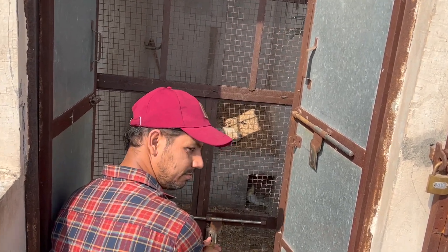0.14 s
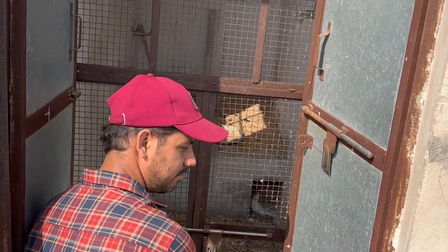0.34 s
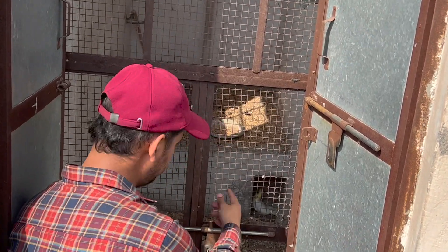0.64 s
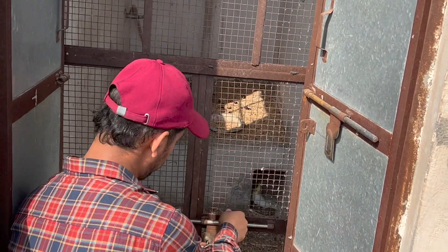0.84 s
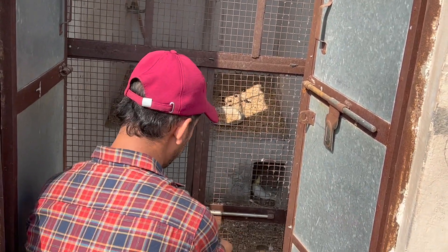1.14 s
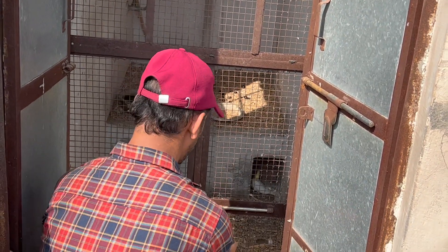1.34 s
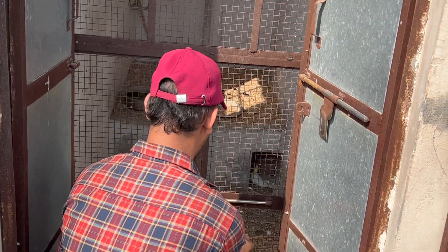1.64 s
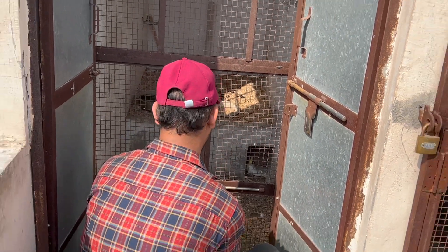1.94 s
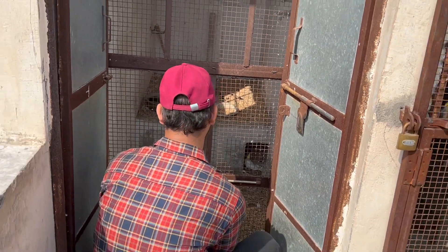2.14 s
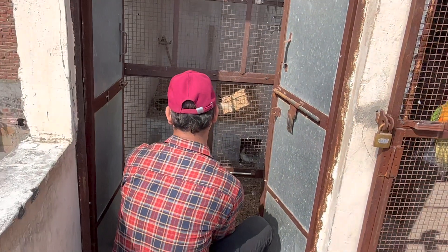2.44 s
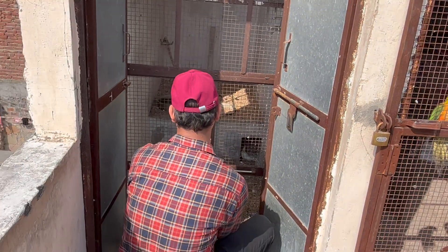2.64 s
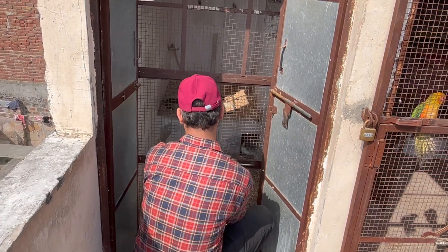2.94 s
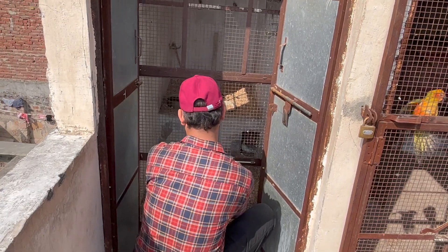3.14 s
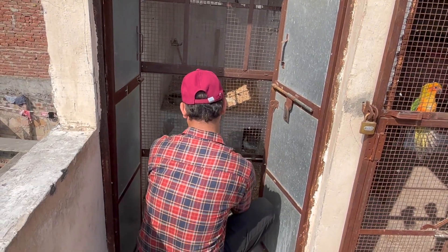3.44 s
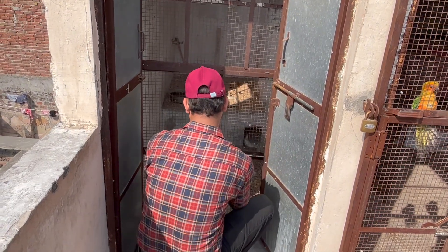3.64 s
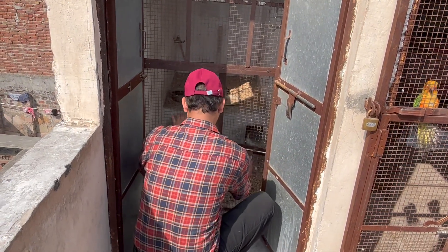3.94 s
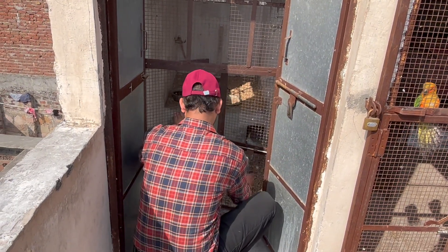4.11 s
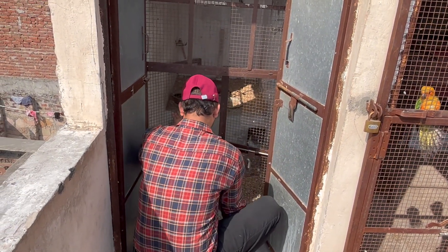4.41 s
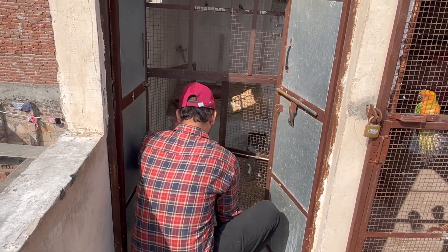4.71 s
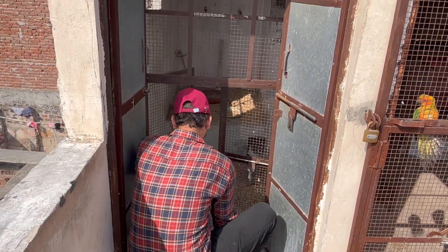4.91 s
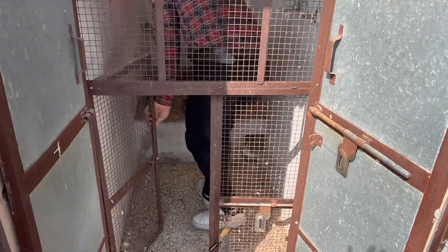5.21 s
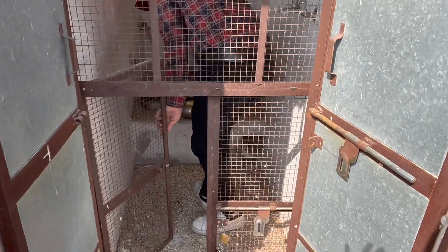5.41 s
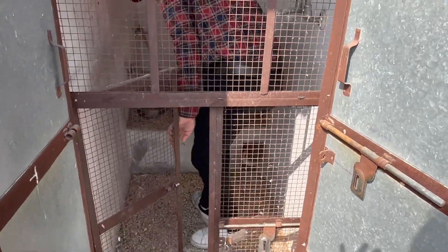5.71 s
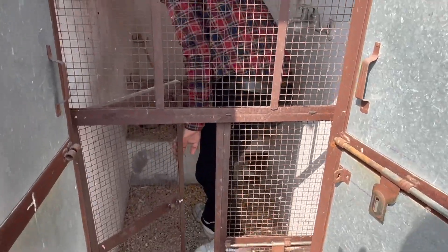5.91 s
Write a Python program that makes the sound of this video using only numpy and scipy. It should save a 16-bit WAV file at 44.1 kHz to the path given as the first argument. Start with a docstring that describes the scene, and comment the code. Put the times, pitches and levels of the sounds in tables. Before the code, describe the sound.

A metal cage door clacks sharply at about 0.1 and 0.5 seconds, then knocks more softly around 1 second as shoes scuff faintly on grit. A parrot gives a rising whine at 1 second, followed by hoarse chatter. From 1.6 to 2.4 seconds, three shrill screeches come from close ahead, the loudest calls, with one faint, distant horn beneath them. A softer whine follows at 2.5 seconds. A second, raspier parrot screeches from the right at 3 seconds, then four times between 3.8 and 5 seconds, while peeps, whines and chatter continue ahead. Light door knocks, scuffs and tiny squeaks return from 5 seconds, and a last screech comes from the right at about 6 seconds. The small aviary's hard walls add a short echo, and a low town rumble lies far behind, all heard on a phone outside the mesh.

```python
"""Parrots in a small walled aviary on a roof terrace, heard from outside on a phone with two mic ports.
Membranes in their throats make rising whines, hoarse chatter and runs of shrill screeches,
first from a bird straight ahead, then from one off to the right. Someone handles the cage door,
which clacks and knocks, and shoes scuff the grit; the hard walls answer with a short echo.
Far behind lie a low town rumble and one horn."""
import sys
import numpy as np
from scipy import signal
from scipy.fft import rfft, irfft, next_fast_len
from scipy.io import wavfile
from scipy.ndimage import map_coordinates

SR = 44100
rng = np.random.default_rng(int(sys.argv[2]) if len(sys.argv) > 2 else 0)


def dump(signal):
    """Clip the signal to [-1, 1] and save it as 16-bit WAV at the path in sys.argv[1]."""
    limited = np.clip(np.atleast_2d(signal).T, -1, 1)
    pcm = np.round(limited * 32767).astype(np.int16)
    wavfile.write(sys.argv[1], SR, pcm)


N = 267334
TIME = np.arange(N) / SR

# the town, far behind the cage: freq_hz, gain_db
RUMBLE_SPECTRUM = [(15, -65), (25, -24), (40, -3.5), (68, 1.5), (137, -8), (220, -19), (350, -30),
                   (570, -100)]
TOWN_SPECTRUM = [(88, -32.5), (150, -2), (273, -5), (343, -1.5), (636, -9.5), (1070, -9), (3030, -15),
                 (7790, -30.5), (9270, -35), (11700, -23), (14500, -32), (16000, -47)]
# rise and fall of the rumble: time_s, gain_db
RUMBLE_SWELLS = [(0.0, -36.5), (1.38, -47), (1.55, -38.5), (2.43, -49), (2.67, -34), (2.88, -42.5),
                 (3.41, -38.5), (3.59, -62.5), (3.81, -43), (3.91, -62.5), (4.59, -51), (4.62, -43),
                 (4.71, -50.5), (6.06, -46)]
# contacts at the cage door: start_s, snap and body levels as crack_db, frame_db, thud_db, snap_db
DOOR_KNOCKS = [(0.033, -48, -40, -74, -33), (0.1325, -15.5, -15, -33.5, -9.5),
               (0.4957, -11.5, -25, -34.5, -23), (0.918, -31, -27.5, -34, -33.5),
               (1.176, -29, -36.5, -48, -36.5), (2.919, -41, -39, -63, -37),
               (4.462, -43.5, -37.5, -48, -41), (5.074, -28, -29.5, -46.5, -44),
               (5.191, -24.5, -30.5, -65, -27.5), (5.379, -52, -32, -38.5, -44),
               (5.535, -50, -32, -41, -42), (5.794, -53, -27.5, -45, -45), (5.885, -45, -27.5, -41.5, -44)]
# colours of a contact (metal on metal, bright crack, dull thud): freq_hz, gain_db
SNAP_SPECTRUM = [(2000, -7.5), (8000, -21.5), (11500, -5), (14500, -1.5), (16000, -20)]
CRACK_SPECTRUM = [(2060, -23), (3500, -8.5), (8260, -3), (10100, -16), (10300, -8.5), (10900, -1.5),
                  (13800, -21.5), (14500, -15), (16000, -42)]
THUD_SPECTRUM = [(40, -3.5), (80, -15.5), (450, 6.5), (900, -7), (2500, -58.5)]
# resonances of the door frame: freq_hz, width_hz, gain_db
FRAME_MODES = [(1084, 7.4, 2), (1408, 32, 6), (2274, 39, -3.5), (2900, 60, 1.5), (4060, 18, -8)]
# wire, hinge and beak: start_s, length_s, pitch_hz, level_db
SQUEAKS = [(0.397, 0.044, 8240, -42.5), (3.004, 0.038, 11750, -29.5), (3.515, 0.095, 2776, -53),
           (4.023, 0.044, 6370, -38.5), (5.651, 0.03, 1080, -53), (5.728, 0.048, 1075, -51.5)]
# shoes and door on the gritty floor: start_s, length_s, rub_db, grit_db
SCUFFS = [(0.924, 0.19, -40.5, -45), (1.244, 0.18, -41, -43), (1.541, 0.14, -53, -34),
          (2.459, 0.12, -42, -33.5), (5.198, 0.068, -41, -32.5), (5.275, 0.15, -46, -59.5)]
# colours of a scuff: freq_hz, gain_db
RUB_SPECTRUM = [(100, -30.5), (350, 8.5), (700, -1.5), (1400, 1.0), (4000, -28.5)]
GRIT_SPECTRUM = [(500, -26.0), (1500, -2), (4000, -2.0), (9000, -8), (15000, -4.5)]
# resonance of a parrot's throat: freq_hz, gain_db
THROAT = [(700, -25.5), (1100, -13), (1500, -11.5), (2100, -4.5), (3100, 2), (4200, -2.5), (6300, -2),
          (8300, -8), (10500, -10.5), (12500, -16), (15000, -23.5)]
# rising whines: start_s, end_s, top_hz, gain_db, hoarseness (0-1)
WHINES = [(0.997, 1.248, 2987, -23.5, 0.02), (2.487, 2.751, 3058, -34, 0.1),
          (3.691, 3.917, 3074, -29, 0.13), (5.789, 5.978, 3150, -37, 0.43)]
# hoarse chatter and short clear notes: start_s, end_s, first_hz, last_hz, gain_db
SQUEALS = [(1.19, 1.255, 1580, 2560, -34.5), (1.265, 1.31, 3700, 3990, -32), (1.3, 1.39, 2320, 2473, -31.5),
           (1.395, 1.445, 3860, 3930, -27.5), (1.445, 1.51, 3580, 3133, -24.5),
           (1.52, 1.61, 3430, 4007, -26.5), (2.55, 2.64, 2950, 3700, -38.5),
           (3.24, 3.31, 2200, 2357, -39.5), (3.32, 3.37, 3780, 3910, -37), (3.41, 3.47, 3820, 3937, -36),
           (4.7, 4.78, 3595, 3140, -35.5), (4.97, 5.05, 3870, 4096, -41.5)]
PEEPS = [(1.85, 1.91, 3560, 3570, -20), (2.965, 3.03, 3205, 3216, -34.5), (3.06, 3.18, 3684, 3620, -26.5)]
# toneless calls: start_s, length_s, level_db
RASPS = [(1.229, 0.052, -29.5), (1.268, 0.066, -35.5), (1.383, 0.12, -27), (1.821, 0.13, -18.5),
         (3.248, 0.12, -29.5), (3.35, 0.13, -35.5), (3.949, 0.12, -40), (4.604, 0.13, -39),
         (4.918, 0.085, -36)]
# colour of a rasp: freq_hz, gain_db
RASP_SPECTRUM = [(900, -25.5), (1700, -25), (2400, 0), (3600, 5), (5000, -0.5), (6200, -4.5), (8000, -9),
                 (11000, -4), (15000, -18.5)]
# shrill calls of both parrots: start_s, end_s, attack_s, gain_db, top_hz, late_hz,
# fundamental_db, upper_partials_db, half_pitch_partials_db, warble (share of pitch)
SCREECHES = [(1.619, 1.847, 0.073, -13, 2150, 2028, -11.5, -10, -16, 0.031),
             (1.834, 2.04, 0.036, -16, 2149, 1959, -3.5, -1.5, -15.5, 0.013),
             (2.121, 2.355, 0.068, -16.5, 2196, 1970, -8.5, -4, -42, 0.035),
             (3.005, 3.234, 0.036, -20, 2129, 1960, -5.5, -3.5, -24.5, 0.026),
             (3.764, 3.996, 0.082, -23.5, 2233, 2045, -6.5, -7, -15, 0.027),
             (4.126, 4.342, 0.092, -27, 2213, 2015, -6, -2.5, -10.5, 0.024),
             (4.459, 4.718, 0.052, -21.5, 2111, 1998, -9, -8, -8.5, 0.033),
             (4.734, 4.944, 0.057, -25.5, 2298, 2025, -3, -3.5, -9, .022),
             (5.955, 6.178, 0.078, -19, 2245, 2004, -3.5, -9, -22.5, 0.03)]
# the far horn: harmonic_number, level_db
HORN_HARMONICS = [(1, -39.5), (2, -53.5), (3, -51), (4, -61.5)]
# echo time of the aviary walls: freq_hz, t60_s
WALL_DECAY = [(150, 0.28), (1000, 0.36), (4000, 0.32), (8000, 0.2), (15000, 0.13)]
# how alike the two mic ports hear sound from ahead and from the right: freq_hz, likeness (0-1)
AHEAD_LIKENESS = [(60, 0.92), (250, 0.81), (640, 0.22), (1400, 0.39), (3000, 0.78), (8000, 1), (10000, 1),
                  (13000, 1)]
RIGHT_LIKENESS = [(2000, 0.068), (6000, 0.39), (8000, 1), (10000, 1), (13000, 0.77)]
# phase by which the left port leads, for the same two directions: freq_hz, lead_turns
AHEAD_LEAD = [(500, 0), (1400, .22), (2100, .14), (4200, .04), (6200, -.08), (8200, -.2), (10000, -.5),
              (12500, -.93), (15600, -1.3)]
RIGHT_LEAD = [(300, 0), (2100, -1.1), (3100, -1.33), (4200, -1.72), (6200, -1.93), (8200, -2.2),
              (10000, -2.5), (12500, -2.9), (15600, -3.3)]

RIGHT_BIRD_FROM_S = 2.9  # from here on the screeches come from the right


def amp(db):
    return 10 ** (np.asarray(db) / 20)


def unit(x):
    return x / np.sqrt(np.mean(x ** 2) + 1e-20)


def along(points, hz):
    """Read (freq_hz, value) points on a log frequency axis."""
    freqs, values = np.transpose(points)
    return np.interp(np.log(hz + 1), np.log(freqs + 1), values)


def wobble(rate, size):
    """A smooth random curve, rate knots a second."""
    knots = rng.standard_normal(int(size * rate / SR) + 4)
    return map_coordinates(knots, [np.arange(size) * rate / SR])


def filtered(x, response):
    """x times a complex response of frequency."""
    size = x.shape[-1]
    padded = next_fast_len(size + 8192)
    return irfft(rfft(x, padded) * response(np.fft.rfftfreq(padded, 1 / SR)), padded)[..., :size]


def noise(spectrum, shape):
    """Noise of rms 1 with the given colour."""
    return unit(filtered(rng.standard_normal(shape), lambda hz: amp(along(spectrum, hz))))


def gate(t, length, fade):
    """1 from time 0 to length, with sloping edges."""
    return np.clip(np.minimum(t, length - t) / fade, 0, 1)


def add(out, start, x):
    """Mix x into out from the given time on."""
    part = out[..., max(round(start * SR), 0):][..., :x.shape[-1]]
    part += x[..., :part.shape[-1]]


def aviary(x, wet_db):
    """Direct sound and wall echoes, as two rows: what both mic ports share, and the diffuse part."""
    hz, t, bands = signal.stft(rng.standard_normal((2, SR // 2)), SR, nperseg=256)
    tail = signal.istft(bands * amp(-60 * t / along(WALL_DECAY, hz)[:, None]), SR, nperseg=256)[1]
    tail = np.pad(tail / np.linalg.norm(tail[0]), ((0, 0), (SR // 400, 0)))
    wet = amp(wet_db)
    tail[0] *= wet / np.hypot(1, wet)
    tail[0, 0] = 1 / np.hypot(1, wet)  # the direct path
    return signal.fftconvolve(x[None], tail, axes=1)


def town(wash_db=-46.5, fade_db_per_s=1.46):
    """The town beyond the terrace: a lumpy low rumble under a wash that slowly sinks."""
    swell_db = np.interp(TIME, *np.transpose(RUMBLE_SWELLS))
    lumps_db = 2 * wobble(18, N)
    rumble = noise(RUMBLE_SPECTRUM, (2, N)) * amp(swell_db + 1.5 + lumps_db)
    wash = noise(TOWN_SPECTRUM, (2, N)) * amp(wash_db - fade_db_per_s * TIME + wobble(12, N))
    return rumble + wash


def whistle(pitch_hz=2735):
    """A faint whistle that falters and fades after the first second."""
    out = np.zeros((2, N))
    level_db = np.interp(TIME, [0, .4, .85, 1.1], [-48.5, -53.0, -56.0, -84.5]) + 2.62 * wobble(11, N)
    out[0] = amp(level_db) * np.sin(2 * np.pi * pitch_hz * TIME + 1.1 * wobble(38.0, N))
    return out


def door_frame(hz):
    """Response of the frame: damped resonances of alternating sign."""
    return sum((-1) ** k * amp(db) * 1j * hz * width / (centre ** 2 - hz ** 2 + 1j * hz * width)
               for k, (centre, width, db) in enumerate(FRAME_MODES))


def door_knocks():
    """Each contact is a brief snap, a bright crack, a short ring of the frame and a dull thud."""
    out, t = np.zeros((2, N)), np.arange(SR // 5) / SR
    decay = lambda db, t60_s: amp(db - 60 * t / t60_s)
    for start, crack_db, frame_db, thud_db, snap_db in DOOR_KNOCKS:
        snap = noise(SNAP_SPECTRUM, len(t)) * decay(snap_db, t60_s=0.021)
        crack = noise(CRACK_SPECTRUM, len(t)) * decay(crack_db, t60_s=0.023)
        ring = unit(filtered(rng.standard_normal(len(t)), door_frame)) * decay(frame_db, t60_s=0.029)
        thud = noise(THUD_SPECTRUM, len(t)) * decay(thud_db, t60_s=0.058)
        add(out, start, aviary(snap + ring, wet_db=-0.5))
        add(out, start, aviary(crack + thud, wet_db=6.5))
    return out


def wire_ticks(count=26):
    """The mesh and loose seed husks tick faintly at random moments."""
    out, t = np.zeros(N), np.arange(SR // 40) / SR
    for when, size, colour in rng.random((count, 3)):
        peak_hz = 7000 + 6500 * colour
        tick = noise([(1000, -22), (peak_hz, 0), (16000, -8)], len(t)) * amp(-60 * t / .01)
        add(out, when * N / SR, amp(-54 + 14 * size) * tick)
    return aviary(out, wet_db=-0.5)[:, :N]


def partial(phase, rasp):
    """One partial; the share rasp of its power is scattered into a noisy skirt."""
    size, rasp = len(phase), np.clip(rasp, 0, 1)
    skirt = wobble(1300, size) * np.sin(phase) + wobble(1300, size) * np.cos(phase)
    return np.sqrt(2 * (1 - rasp)) * np.sin(phase) + np.sqrt(rasp) * skirt


def squeaks():
    """Wire, hinge and beak give tiny, unsteady squeaks inside the cage."""
    out = np.zeros((2, N))
    for start, length, hz, db in SQUEAKS:
        t = np.arange(0, length, 1 / SR)
        tone = partial(2 * np.pi * hz * t + 0.3 * wobble(470, len(t)), rasp=0.071)
        envelope = amp(db + 4 * wobble(49, len(t))) * gate(t, length, 0.003)
        add(out, start, aviary(envelope * tone, wet_db=4.5))
    return out


def scuffs():
    """Shoes and door drag on the floor: a low rub with grit crackling on top."""
    out = np.zeros((2, N))
    for start, length, rub_db, grit_db in SCUFFS:
        t = np.arange(0, length, 1 / SR)
        rub = amp(rub_db) * noise(RUB_SPECTRUM, len(t))
        grit = amp(grit_db + 6.2 * wobble(500, len(t))) * noise(GRIT_SPECTRUM, len(t))
        envelope = gate(t, length, 0.016) * amp(-6 * t / length)
        add(out, start, aviary((rub + grit) * envelope, wet_db=-0.5))
    return out


def syrinx(pitch, warble, warble_hz, jitter):
    """Phase of a membrane whose pitch is shaken by a fast, lopsided warble and by chance."""
    size = len(pitch)
    shake = 2 * np.pi * np.cumsum(warble_hz * (1 + 0.085 * wobble(40.8, size))) / SR
    bend = warble * (np.sin(shake) - np.sin(2 * shake) / 3) + jitter * wobble(700, size)
    return 2 * np.pi * np.cumsum(pitch * (1 + bend)) / SR


def swell(t, length, attack_s, attack_db, release_s=0.05, release_db=13.5):
    """Level of a call in dB: a rounded attack, a hold and a short release."""
    rise = np.clip(1 - t / attack_s, 0, 1)
    fall = np.clip(1 - (length - t) / release_s, 0, 1)
    return -attack_db * rise ** 1.42 - release_db * fall ** 2


def soft_call(pitch, gain_db, partials_db, jitter, rasp):
    """A soft, fluttering call; an overtone swells as it crosses the throat's resonance."""
    t = np.arange(len(pitch)) / SR
    waver = .012 * wobble(50, len(t))
    phase = syrinx(pitch * (1 + waver), warble=.013, warble_hz=85, jitter=jitter)
    voice = np.zeros(len(t))
    for k, db in enumerate(partials_db, 1):
        throat = amp(along(THROAT, k * pitch) - along(THROAT, pitch)) * (k * pitch < SR / 2)
        voice += amp(db) * throat * partial(k * phase, rasp * k)
    flutter_db = 3 * wobble(70, len(t))
    return voice * amp(gain_db + flutter_db) * gate(t, t[-1], .015)


def whines(from_hz=1350, rise_s=.163, sag_hz_per_s=1800, attack_s=0.072, fade_db_per_s=21):
    """A whine climbs a rounded arc, then sags; hoarseness adds overtones, jitter and noise."""
    out = np.zeros((2, N))
    for start, end, top_hz, db, hoarse in WHINES:
        t = np.arange(0, end - start, 1 / SR)
        arc = np.sin(np.pi / 2 * np.minimum(t / rise_s, 1))
        pitch = from_hz + (top_hz - from_hz) * arc - sag_hz_per_s * np.maximum(t - rise_s, 0)
        fade_db = fade_db_per_s * np.maximum(t - attack_s, 0)
        gain_db = db + swell(t, end - start, attack_s, attack_db=22.5) - fade_db
        partials_db = [0, -20 + 12 * hoarse, -31 + 12 * hoarse]
        call = soft_call(pitch, gain_db, partials_db, .011 + .03 * hoarse, rasp=.002 + .15 * hoarse)
        add(out, start, aviary(call, wet_db=1))
    return out


def notes(rows, partials_db, jitter, rasp, wet_db):
    """Short calls that slide straight from one pitch to another."""
    out = np.zeros((2, N))
    for start, end, first_hz, last_hz, db in rows:
        pitch = np.linspace(first_hz, last_hz, round((end - start) * SR))
        add(out, start, aviary(soft_call(pitch, db, partials_db, jitter, rasp), wet_db))
    return out


def squeals():
    """Hoarse chatter: a jittery membrane with strong overtones."""
    return notes(SQUEALS, partials_db=[3.5, -8, -14, -13], jitter=.024, rasp=.03, wet_db=0.5)


def rasps():
    """The membrane flaps irregularly and chops the air into a toneless rattle."""
    out = np.zeros((2, N))
    for start, length, db in RASPS:
        t = np.arange(0, length, 1 / SR)
        rattle = unit(noise(RASP_SPECTRUM, len(t)) * amp(3 * wobble(260, len(t))))
        add(out, start, aviary(amp(db) * rattle * gate(t, length, 0.014), wet_db=-3.5))
    return out


def screech_pitch(progress, top_hz, late_hz, gain_db):
    """The pitch leaps up, sags and drops; the harder the bird pushes, the further the final drop."""
    drop = np.interp(gain_db, [-26, -14], [.94, .83])
    path_hz = [.55 * top_hz, .92 * top_hz, top_hz, .55 * top_hz + .45 * late_hz, late_hz, drop * late_hz]
    return np.interp(progress, [0, .08, .18, .55, .87, 1], path_hz)


def screeches(rows, rasp, waver, wet_db, brighten_db=5.5):
    """A hard-driven membrane: each call brightens and is roughest as the voice catches and lets go."""
    out = np.zeros((2, N))
    for start, end, attack_s, gain_db, top_hz, late_hz, body_db, bright_db, half_db, warble in rows:
        length = end - start
        t = np.arange(0, length, 1 / SR)
        progress, size = t / length, len(t)
        effort_db = swell(t, length, attack_s, attack_db=19.5)
        strain_db = 0.42 * effort_db  # only the second partial follows the whole swell
        upper_db = bright_db + brighten_db * (progress - .5) - strain_db
        base_db = body_db - strain_db
        pitch = screech_pitch(progress, top_hz, late_hz, gain_db)
        phase = syrinx(pitch * (1 + waver * wobble(60, size)), warble, warble_hz=110, jitter=.006)
        rough = rasp + np.interp(progress, [0, .1, .25, .85, 1], [.55, .25, 0, 0, .12])
        # period doubling grows as the call goes on, and comes and goes
        doubling_db = half_db + np.interp(progress, [.2, .55], [-8, 0]) + 5 * wobble(35, size)
        voice = np.zeros(size)
        for k in np.arange(1, 15) / 2:
            balance_db = max(2 - k, 0) * base_db + np.clip(k - 2, 0, 1) * upper_db
            db = along(THROAT, k * pitch) + balance_db + (k % 1 > 0) * doubling_db
            fray = np.interp(k, [4, 6.5], [0, .25])  # the highest partials dissolve into grit
            voice += amp(db + 1.9 * wobble(148.3, size)) * partial(k * phase, rough + fray)
        # turbulent air fills the valleys between the partials
        voice += np.sqrt(rough) * amp(-2.5 + upper_db / 2) * noise(THROAT, size)
        flutter_db = .9 * wobble(56, size)
        envelope = amp(gain_db + effort_db + flutter_db) * gate(t, length, 0.0027)
        add(out, start, aviary(voice * envelope, wet_db))
    return out


def near_parrot():
    """The parrot straight ahead of the microphone: close, loud and piercing."""
    rows = [row for row in SCREECHES if row[0] < RIGHT_BIRD_FROM_S]
    return screeches(rows, rasp=.002, waver=.007, wet_db=-6.5)


def far_horn(start_s=1.82, hold_s=0.28, pitch_hz=362):
    """One horn a long way off, smeared by the streets."""
    out, t = np.zeros((2, N)), np.arange(SR) / SR
    tone = np.zeros(SR)
    for k, db in HORN_HARMONICS:
        level = amp(db + 2.9 * wobble(21, SR))
        tone += level * np.sin(2 * np.pi * k * pitch_hz * t + .5 * wobble(34, SR))
    envelope = np.clip(t / .015, 0, 1) * amp(-80 * np.maximum(t - hold_s, 0))
    add(out[0], start_s, tone * envelope)
    return out


def peeps():
    """Clear notes: a steadier membrane, nearly pure in tone."""
    return notes(PEEPS, partials_db=[0, -19, -29], jitter=.008, rasp=.005, wet_db=-2)


def right_parrot():
    """The parrot off to the right: raspier, less steady and with more echo."""
    rows = [row for row in SCREECHES if row[0] >= RIGHT_BIRD_FROM_S]
    return screeches(rows, rasp=.005, waver=.013, wet_db=-2)


def mic_ports(sound, likeness, lead, left_db):
    """The phone's two ports differ in phase and share part of the sound."""
    shared, diffuse = sound
    left_right = np.array([[1], [-1]])
    angle = lambda hz: np.arccos(np.clip(along(likeness, hz), 0, 1)) / 2
    mid = filtered(shared, lambda hz: np.cos(angle(hz)))
    side = filtered(diffuse, lambda hz: np.sin(angle(hz)))
    pair = (mid + left_right * side) * amp(left_right * left_db / 2)
    return filtered(pair, lambda hz: np.exp(1j * np.pi * along(lead, hz) * left_right))


def scene():
    """From outside the mesh: the cage and most birds lie ahead; one parrot calls from the right."""
    birds = near_parrot() + whines() + peeps() + squeals() + rasps()
    cage = door_knocks() + scuffs() + wire_ticks() + squeaks()
    background = whistle() + far_horn() + town()
    ahead = mic_ports(birds + cage + background, AHEAD_LIKENESS, AHEAD_LEAD, left_db=0.0)
    return ahead + mic_ports(right_parrot(), RIGHT_LIKENESS, RIGHT_LEAD, left_db=0.5)


def record(dry):
    """The phone rounds off the highest peaks and keeps nothing above its band limit."""
    ceiling, top_hz = .92, 15900
    rounded = dry / (1 + (dry / ceiling) ** 8) ** (1 / 8)
    return filtered(rounded, lambda hz: hz < top_hz)


dry = scene()
out = record(dry)
dump(out)
```